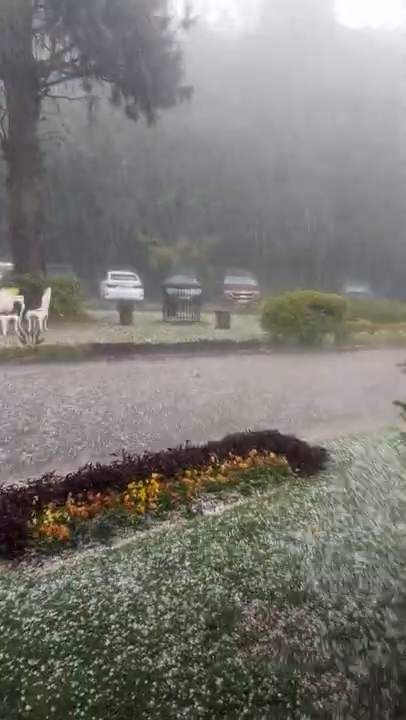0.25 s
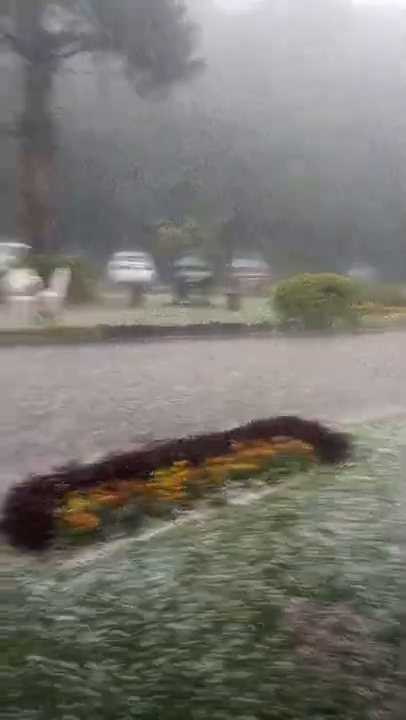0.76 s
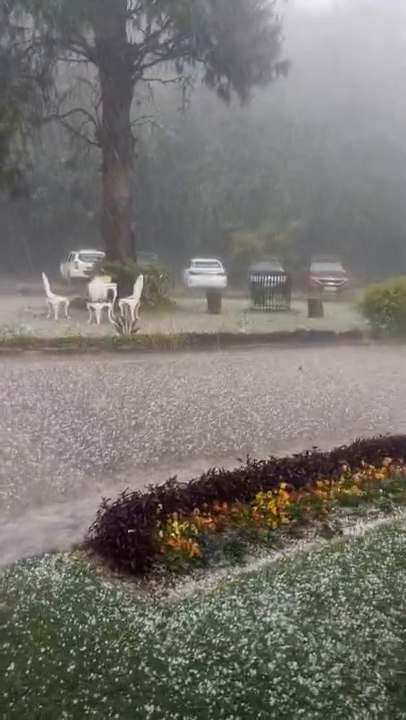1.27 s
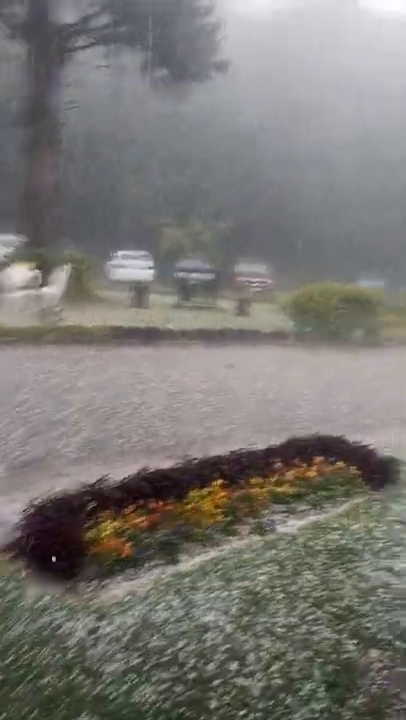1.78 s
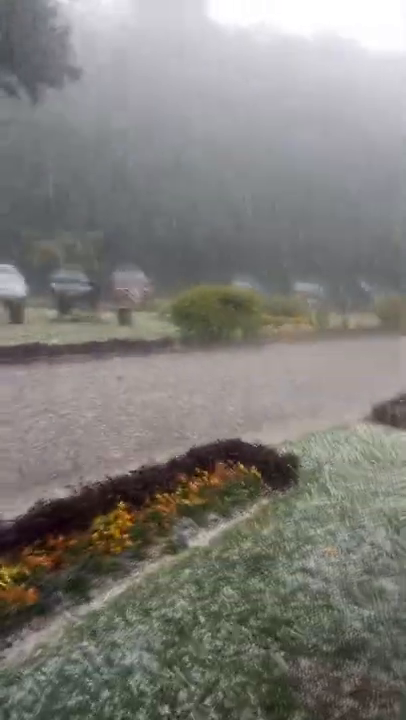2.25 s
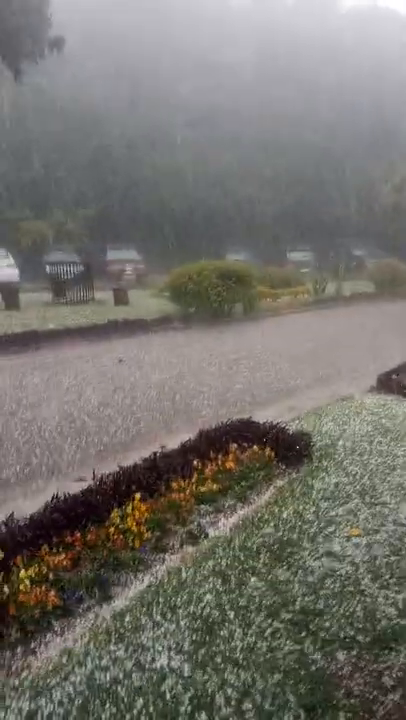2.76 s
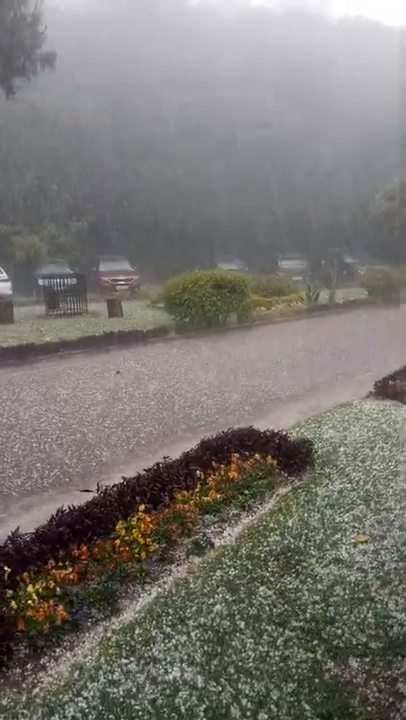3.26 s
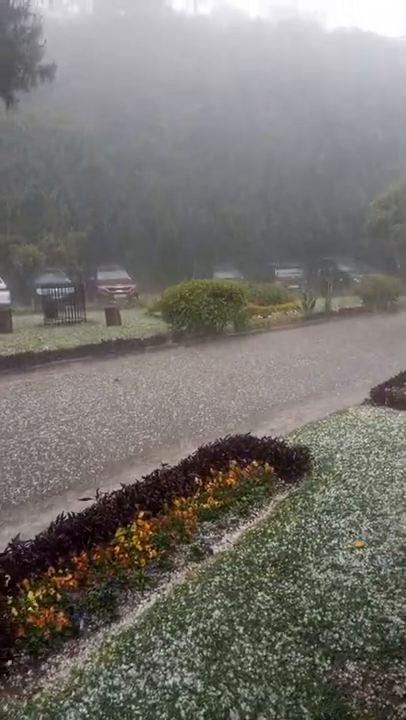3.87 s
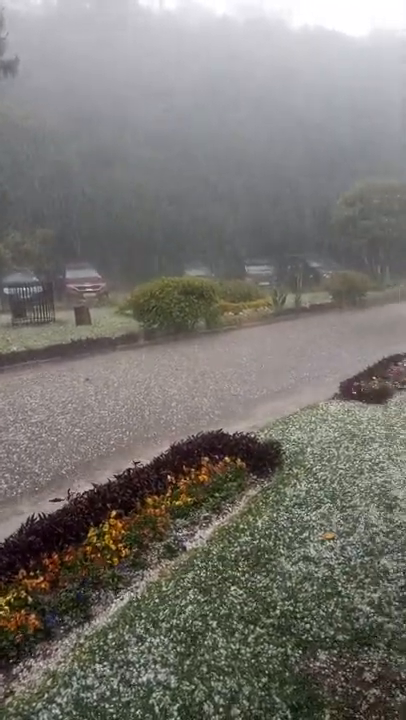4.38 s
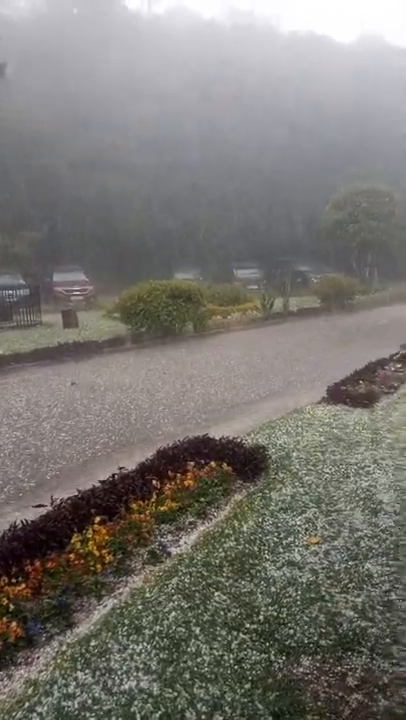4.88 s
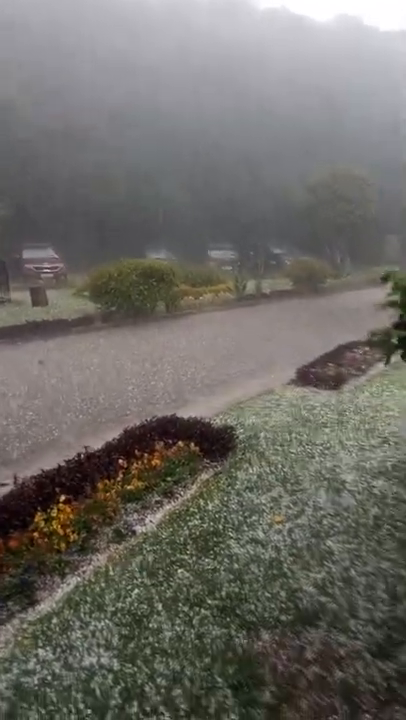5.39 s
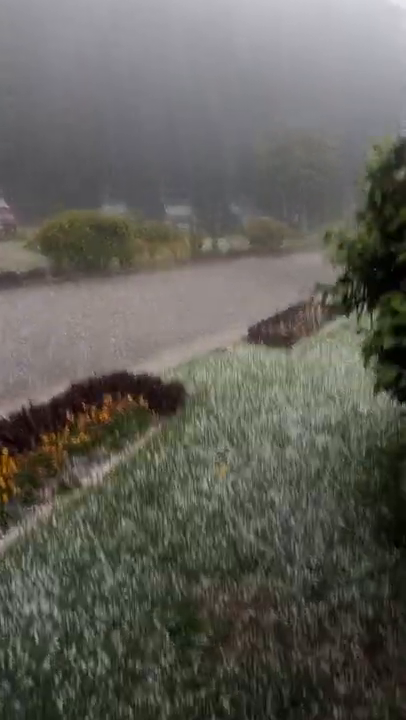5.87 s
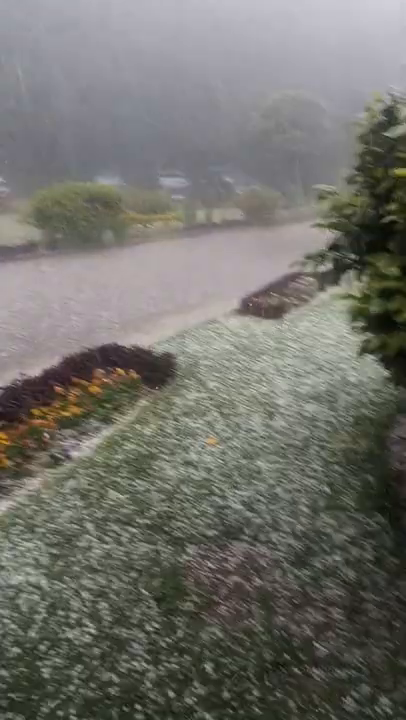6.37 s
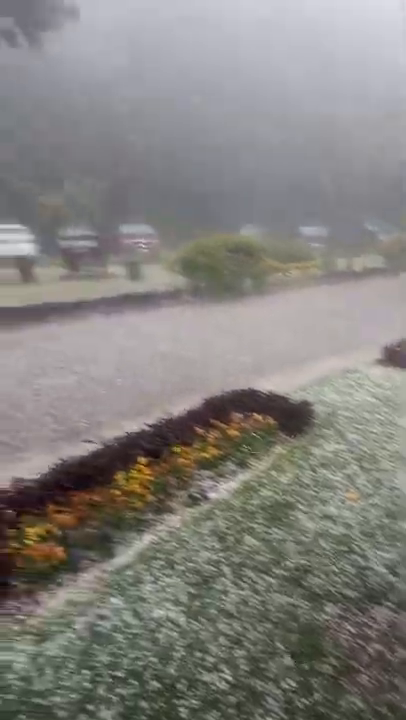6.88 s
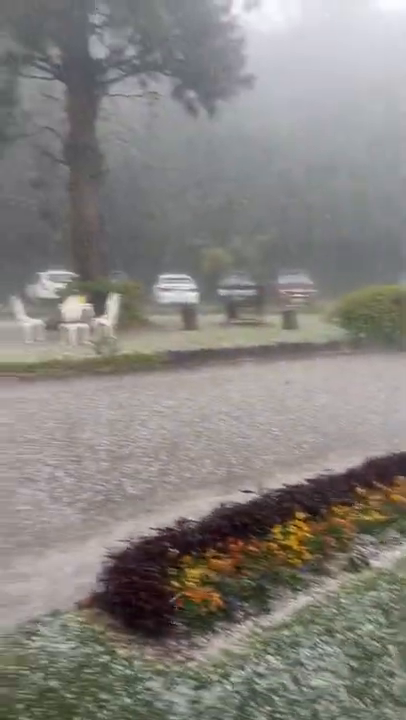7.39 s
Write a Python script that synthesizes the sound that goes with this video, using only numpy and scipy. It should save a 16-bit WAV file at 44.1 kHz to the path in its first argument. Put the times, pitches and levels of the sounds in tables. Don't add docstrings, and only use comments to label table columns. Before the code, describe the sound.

Loud, dense hail and rain roar steadily over lawn, road and shrubs, a bright crackling hiss with sharper knocks from close stones.

```python
import sys
import numpy as np
from scipy import signal
from scipy.fft import rfft, irfft, next_fast_len
from scipy.io import wavfile
from scipy.ndimage import uniform_filter1d

SR = 44100
rng = np.random.default_rng(int(sys.argv[2]) if len(sys.argv) > 2 else 0)


def how_loud(loudness_db):
    steps = np.asarray(loudness_db, float) / 20
    return 10 ** steps


def wav_record(signal):
    frames = np.transpose(np.atleast_2d(signal))
    bounded = np.clip(frames, -1, 1)
    quanta = np.round(bounded * 32767).astype(np.int16)
    wavfile.write(sys.argv[1], SR, quanta)


N = 336924

# (time [s], level [dB], brightness [dB per octave])
STORM = [(0, -10.5, 0.2), (.8, -11, 0.1), (1.6, -11, 0.15), (2.4, -11, 0.), (3.2, -11, 0.),
         (4.0, -11.5, 0.), (4.8, -11.5, 0.), (5.6, -11.5, 0), (6.4, -11.5, 0.3), (7.0, -11.5, 0.),
         (7.64, -11.5, 0.)]


def evened(x):
    return x / np.sqrt(np.mean(x ** 2) + 1e-20)


def add(mix, start_s, sound):
    part = mix[round(start_s * SR):][:len(sound)]
    part += sound[:len(part)]


def humps(modes, hz):
    return sum(db * np.exp(-((hz - centre) / width) ** 2) for centre, width, db in modes)


def filtered(x, curve_db):
    size = 2 * next_fast_len(N // 2 + 2048)
    log_gain = np.log(how_loud(curve_db(np.fft.rfftfreq(size, 1 / SR))))
    cepstrum = irfft(log_gain, size)
    cepstrum[1:size // 2] *= 2
    cepstrum[size // 2 + 1:] = 0
    response = np.exp(rfft(cepstrum))
    return irfft(rfft(x, size) * response, size)[..., :N]


def colour_db(hz):
    # (frequency [Hz], level per Hz [dB])
    colour = [(15, -71), (25, -64), (107, -31.5), (240, -14), (445, -6), (1710, -1), (2420, -2), (3260, -1),
              (5280, -7), (7500, -1), (8810, -9.5), (15500, -11.5)]
    # (frequency [Hz], width [Hz], level [dB])
    housing = [(786, 170, 1.0), (1190, 110, 1.5), (1600, 330, 2), (3080, 340, 2), (4200, 390, 1.0),
               (6400, 330, 1.0), (7070, 270, 0.5), (7910, 190, 1.5), (9700, 400, 1.0), (11500, 1550, -1.5),
               (15500, 2500, -1)]
    f, db = np.transpose(colour)
    return np.interp(np.log(hz + 1), np.log(f + 1), db) + humps(housing, hz)


def swell_db():
    s, db, _ = np.transpose(STORM)
    return np.interp(np.arange(N) / SR, s, db)


def scattered(per_s, mean_db, spread_db):
    when, size, which, detune = rng.random((120, 4))[:round(per_s * N / SR)].T
    return when * N / SR, mean_db + spread_db * (2 * size - 1), which, 2 * detune - 1


def wash(patchy_db, flicker_db):
    hop, size = 128, 512
    frames, hz = N // hop + 5, np.fft.rfftfreq(size, 1 / SR)
    real, imaginary, patches = rng.standard_normal((frames, len(hz), 3)).T
    patches = uniform_filter1d(patches, size=8, axis=0)
    patches = evened(uniform_filter1d(patches, size=14, axis=1))
    gusts = evened(uniform_filter1d(rng.standard_normal(frames), size=8))
    s, _, tilt = np.transpose(STORM)
    octaves = np.log2((hz[:, None] + 300) / 2000)
    tilt_db = octaves * np.interp(np.arange(frames) * hop / SR, s, tilt)
    spectra = (real + 1j * imaginary) * how_loud(patchy_db * patches + flicker_db * gusts + tilt_db)
    return evened(signal.istft(spectra, nperseg=size, noverlap=size - hop)[1][:N])


def ticks(per_s, spread_db, ring_s):
    size_db = spread_db * np.minimum(rng.exponential(1, N), 5)
    hits = how_loud(size_db) * (rng.random(N) < per_s / SR)
    ground = rng.integers(0, 12, N)
    t = np.arange(600) / SR
    fade = how_loud(-60 * t / ring_s)
    out = np.zeros(N)
    for kind, grain in enumerate(rng.standard_normal((12, 600))):
        out += signal.oaconvolve(hits * (ground == kind), grain * fade)[:N]
    return evened(out)


def pellets():
    s, db, which, detune = scattered(per_s=4.8, mean_db=-5.5, spread_db=2.5)
    ring_hz = np.where(which < .6, 1600, 3100) * (1 + 0.096 * detune)
    return list(zip(s, db, ring_hz))


def knocks(rows, cycles, boost_db):
    out = np.zeros(N)
    for s, db, hz in rows:
        u = np.arange(round(3 * SR * 12 / hz)) / SR * hz / cycles
        rise_and_fall = np.e * u * np.exp(-u)
        add(out, s, how_loud(db + boost_db) * rise_and_fall * np.sin(2 * np.pi * u * cycles))
    return out


def scene():
    # (time [s], peak [dB], ring [Hz])
    stones = [(0.0258, 7, 3190), (0.1231, -2, 1610), (0.2184, -1, 3100), (0.5651, 4, 1780),
              (0.7007, 6, 1820), (0.8944, 12, 3000), (0.9692, 2, 1900), (1.1069, 5, 1840),
              (1.1907, 7, 2930), (1.5603, 7, 3130), (1.972, 6, 2930), (2.0911, 1.5, 3430),
              (2.4028, 6, 1675), (2.4458, 5, 1860), (2.617, -2, 1950), (2.8774, 8, 3040),
              (3.3952, -2, 2600), (3.9848, 5, 1476), (4.2038, -1, 2970), (4.881, 4, 1600),
              (5.1891, 4, 2930), (5.3208, 3, 1570), (6.334, -6, 3100), (6.652, 7, 3270), (6.8129, 4, 1850)]
    rain = wash(patchy_db=0.22, flicker_db=.5)
    rain = rain + how_loud(-7.0) * ticks(per_s=900, spread_db=2.5, ring_s=0.015)
    storm = how_loud(swell_db()) * evened(filtered(rain, colour_db))
    mono = storm + knocks(stones + pellets(), cycles=8.0, boost_db=-18.5)
    return np.array([mono, mono])


def overload(x):
    # (frequency [Hz], width [Hz], level [dB])
    capsule = [(6800, 800, 10), (7900, 900, 15)]
    loud = evened(filtered(x, lambda hz: humps(capsule, hz)))
    return np.tanh(loud / 1.05)


def equalised(x):
    hz, power = signal.welch(x, SR, nperseg=1024)
    own_db = uniform_filter1d(10 * np.log10(power), size=5)
    level_db = -9
    return how_loud(level_db) * evened(filtered(x, lambda f: colour_db(f) - np.interp(f, hz, own_db)))


def rounded(x):
    return 1.04 * x / (1 + abs(x / 1.1) ** 4) ** .25


def bumps(width_s, late_s, boost_db):
    # (time [s], peak [dB])
    strong = [(0.096, -51), (0.871, -52), (1.373, -52), (1.611, -52), (1.898, -47), (1.984, -55),
              (2.394, -47), (3.574, -53), (3.828, -55), (4.254, -41), (5.81, -51), (6.703, -54)]
    s, db, *_ = scattered(per_s=15, mean_db=-64, spread_db=4)
    rows = list(strong) + list(zip(s, db))
    half = 800
    push = np.exp(-(np.arange(-half, half) / SR / width_s) ** 2)
    out = np.zeros(N)
    for (s, db), side in zip(rows, rng.choice([-1., 1.], 140)):
        add(out, max(s + late_s - half / SR, 0), side * how_loud(db + boost_db) * push)
    return out


def noise_bands():
    # (start [s], end [s], bands filled [count])
    spells = [(.28, .29, 2), (.53, .73, 5), (1.21, 1.22, 1), (1.53, 1.68, 2), (1.95, 2.05, 3),
              (2.18, 2.35, 4), (2.9, 3.07, 5), (3.27, 3.28, 1), (3.44, 3.45, 4), (3.58, 3.61, 3),
              (4.06, 4.33, 5), (4.43, 4.44, 2), (4.6, 4.81, 8), (5.27, 5.28, 1), (5.46, 5.51, 4),
              (5.57, 5.72, 8), (5.8, 5.84, 4), (6.06, 6.07, 1), (6.27, 6.46, 3), (6.59, 6.6, 2),
              (6.92, 7.18, 3), (7.59, 7.62, 2)]
    start, end = np.repeat(spells, [count for *_, count in spells], axis=0).T[:2]
    when, width = rng.random((len(start), 2)).T
    grid, offset = 1024, 136
    step = np.round(((start + (end - start) * when) * SR - offset) / grid)
    place = (np.arange(len(start)) * (np.sqrt(5) - 1) / 2 + rng.random()) % 1
    lowest_hz, highest_hz = 4100, 14500
    low = lowest_hz * (highest_hz / lowest_hz) ** place ** .85
    high = low + np.interp(place + width, (0, 2), (1000, 1800))
    return zip((step * grid + offset) / SR, low, high)


def fill_bands(x, side_db):
    twin = x[::-1]
    hz, t, (mid, side) = signal.stft([x, twin], SR, nperseg=1024, noverlap=896)
    share = np.zeros(mid.shape)
    for s, low, high in noise_bands():
        moment = np.cos(np.pi / 2 * np.clip((t - s) * SR / 680, -1, 1) ** 4)
        share = np.maximum(share, ((hz > low) & (hz < high))[:, None] * moment)
    share = np.clip(share * how_loud(side_db), 0, 1)
    mid, side = mid * np.sqrt(1 - share ** 2), side * share
    return signal.istft([mid + side, mid - side], SR, nperseg=1024, noverlap=896)[1][:, :N]


def roll_off(x):
    return signal.sosfilt(signal.butter(12, 16550, fs=SR, output="sos"), x)


def record(dry):
    swell = swell_db()
    storm_db, _ = np.transpose(STORM)[1], None
    drift = how_loud(0.51 * (swell - np.mean(storm_db)))
    x = rounded(drift * equalised(overload(dry[0])))
    x = signal.sosfilt(signal.butter(2, 100, "highpass", fs=SR, output="sos"), x)
    treble_limit = signal.firwin(801, 15780, window=("kaiser", 9), fs=SR)
    x = signal.oaconvolve(x, treble_limit, "same")
    x = x + bumps(width_s=0.002, late_s=0.026, boost_db=7.0)
    return roll_off(fill_bands(x, side_db=-2.8))


dry = scene()
out = record(dry)
wav_record(out)
```